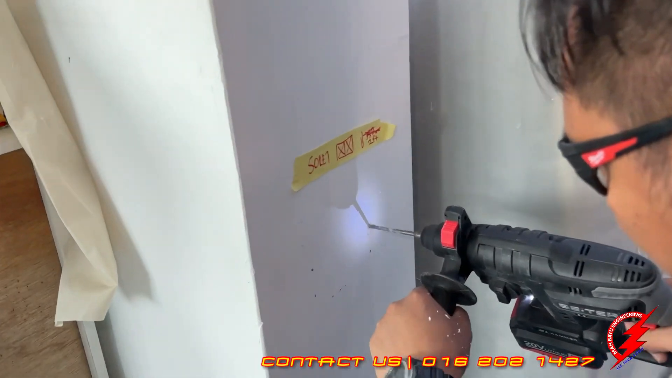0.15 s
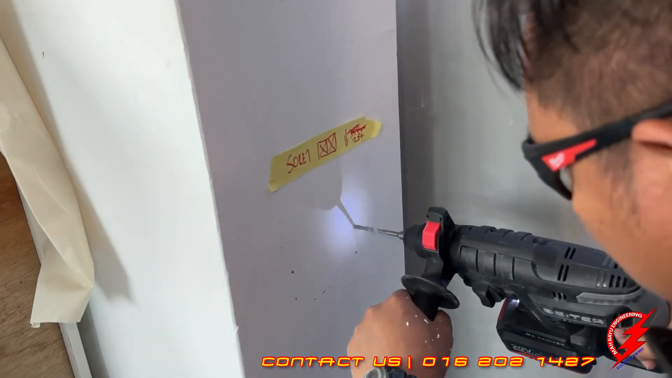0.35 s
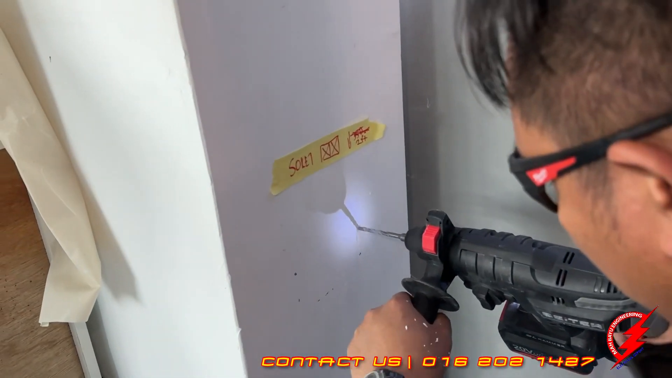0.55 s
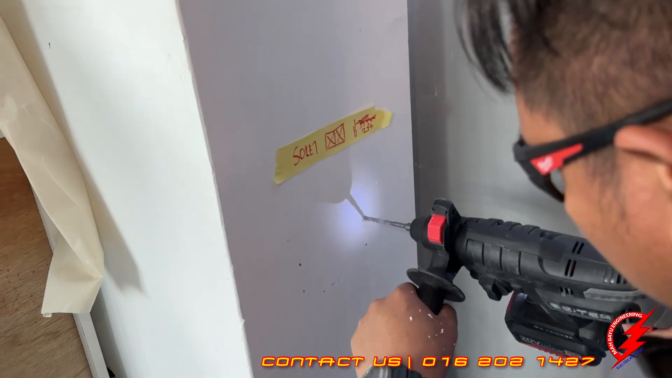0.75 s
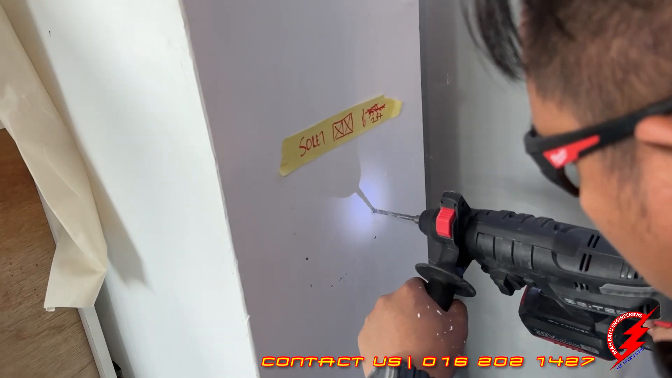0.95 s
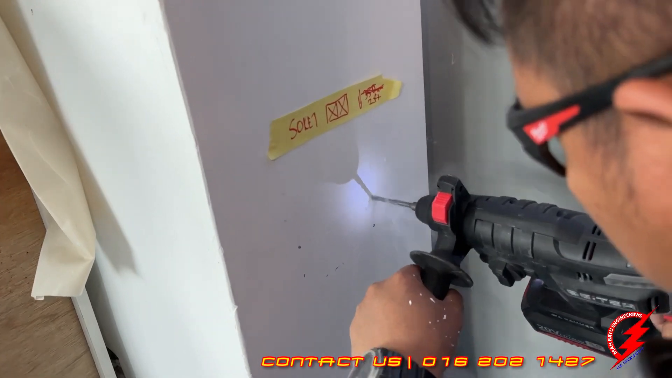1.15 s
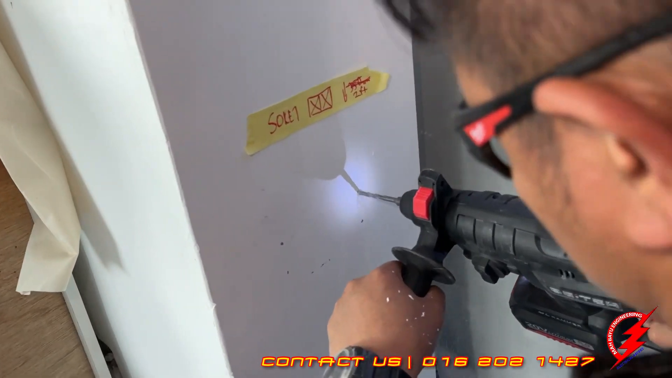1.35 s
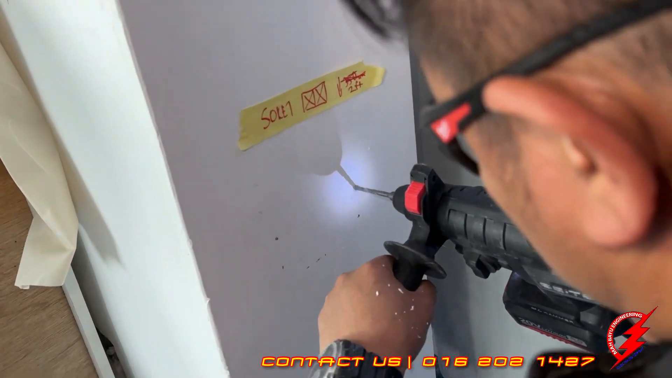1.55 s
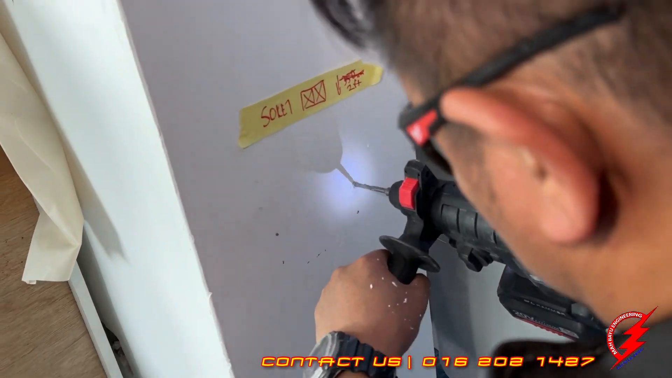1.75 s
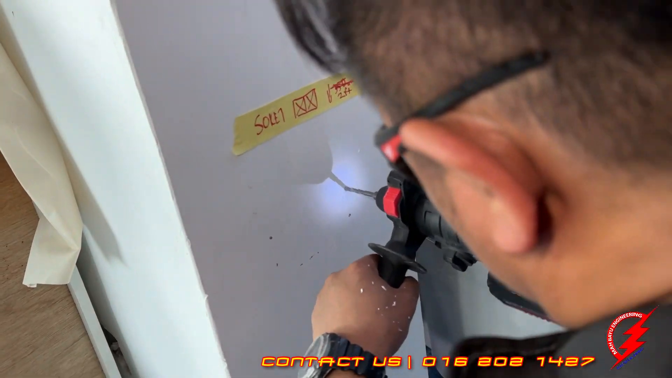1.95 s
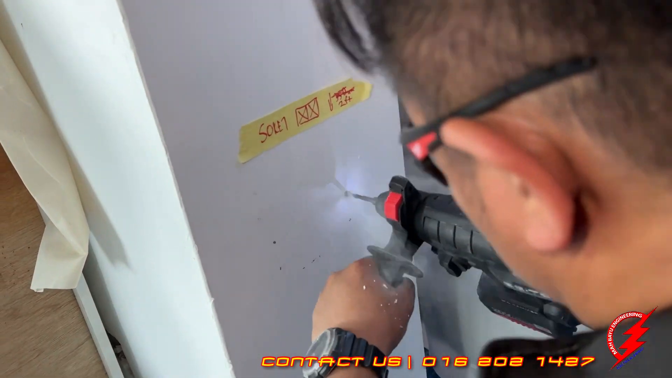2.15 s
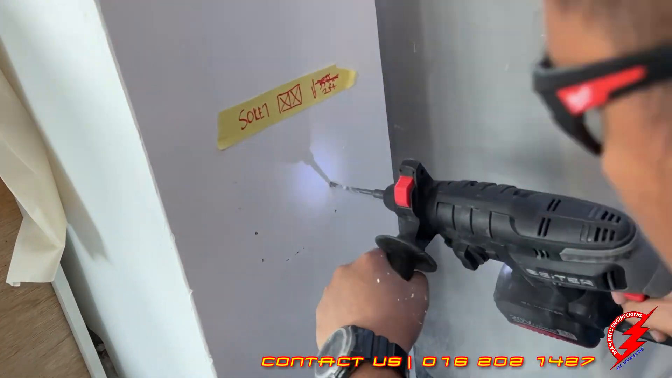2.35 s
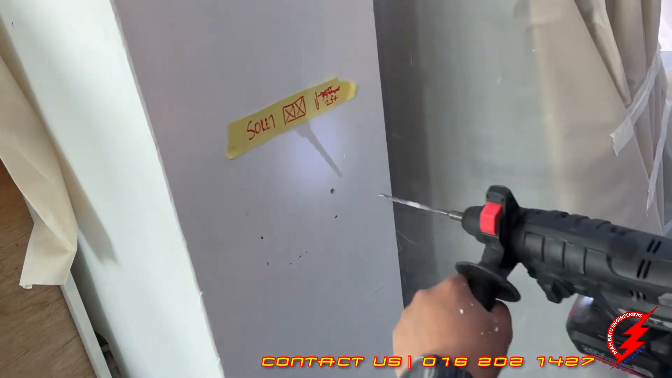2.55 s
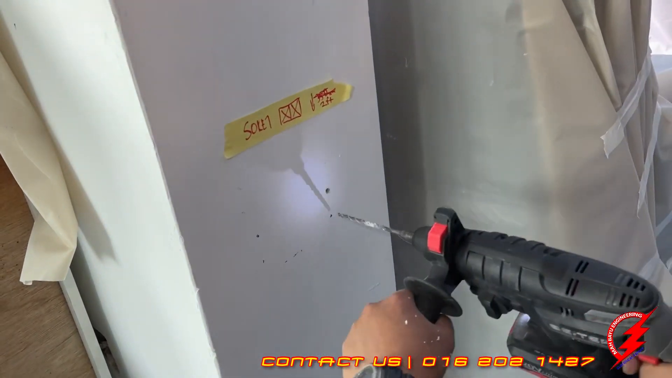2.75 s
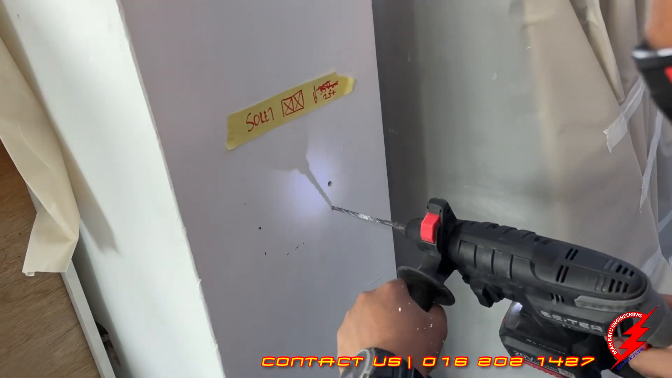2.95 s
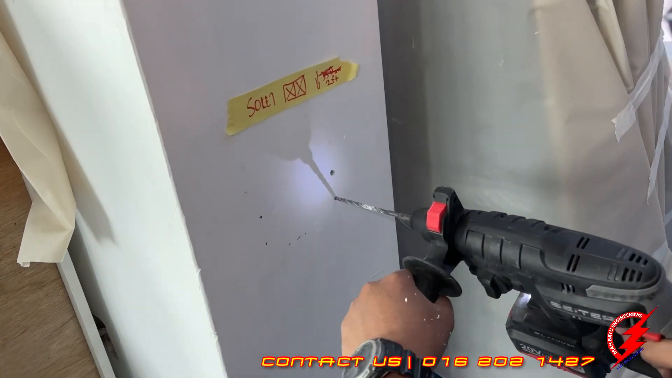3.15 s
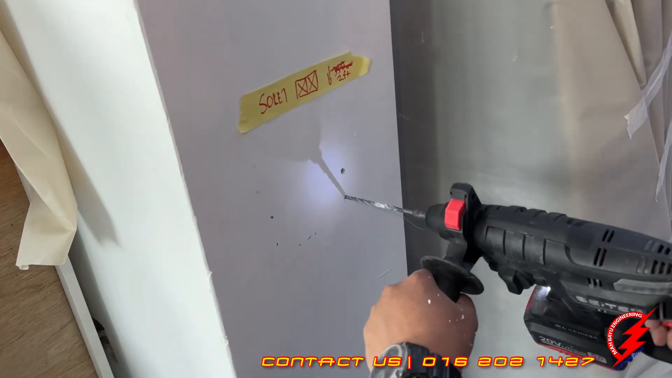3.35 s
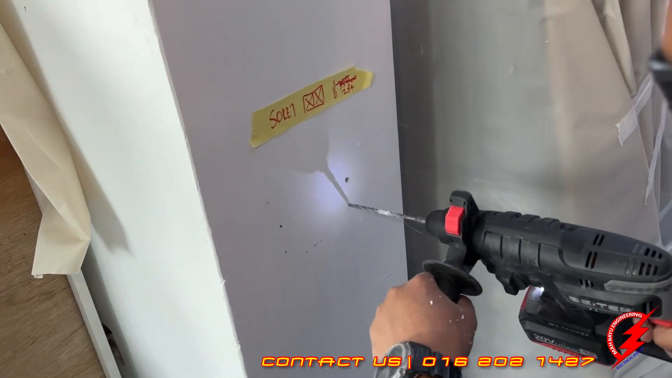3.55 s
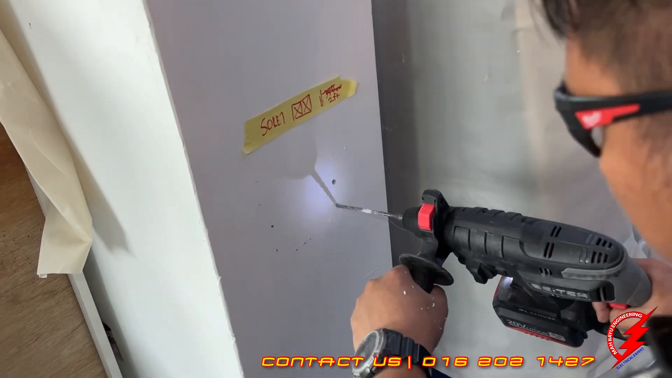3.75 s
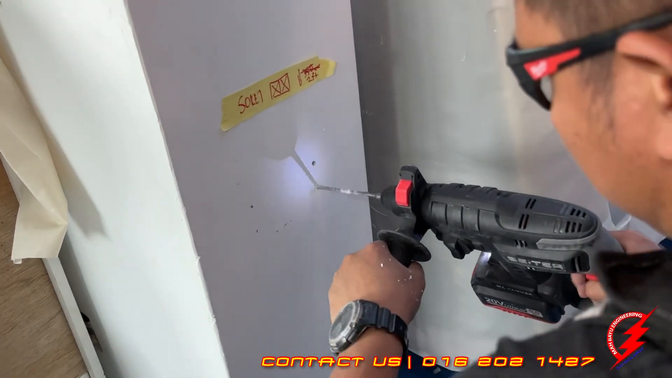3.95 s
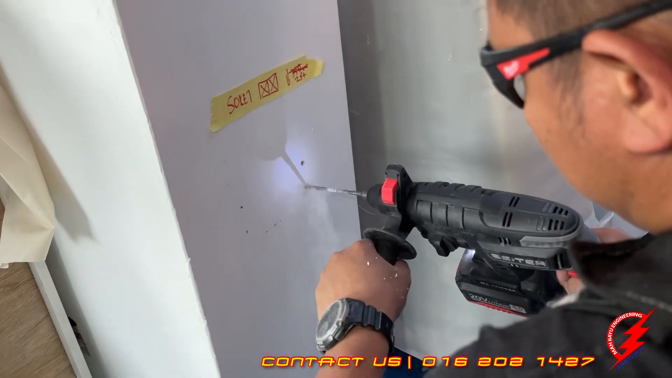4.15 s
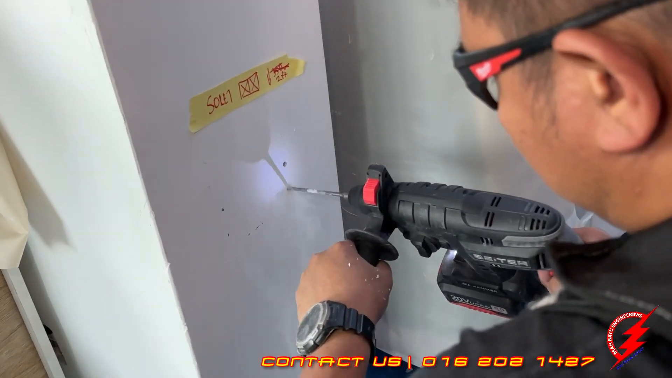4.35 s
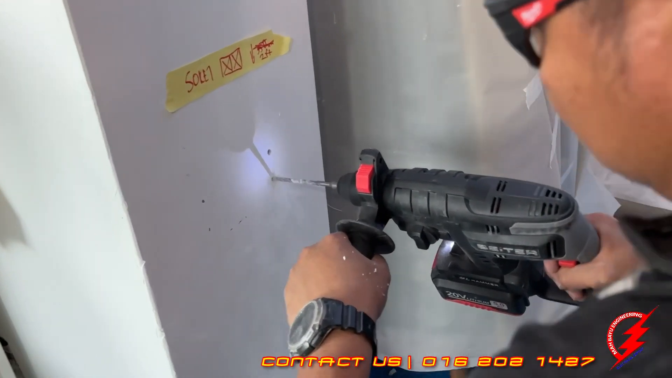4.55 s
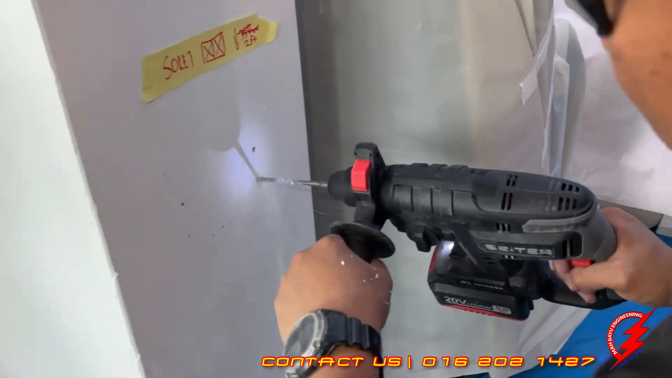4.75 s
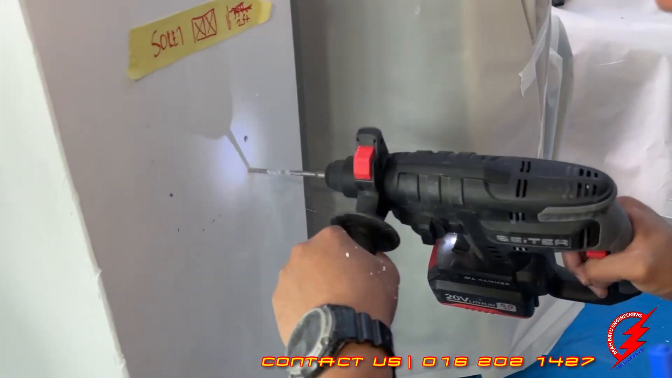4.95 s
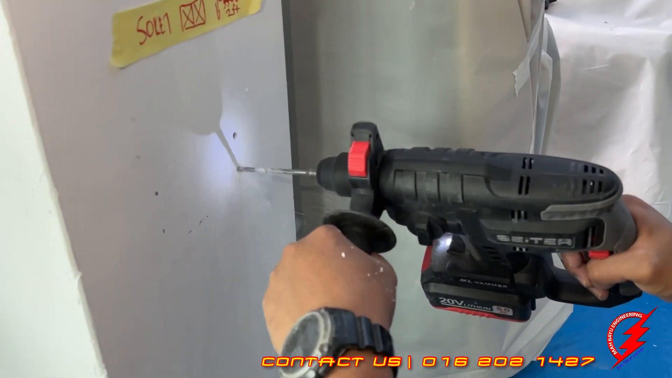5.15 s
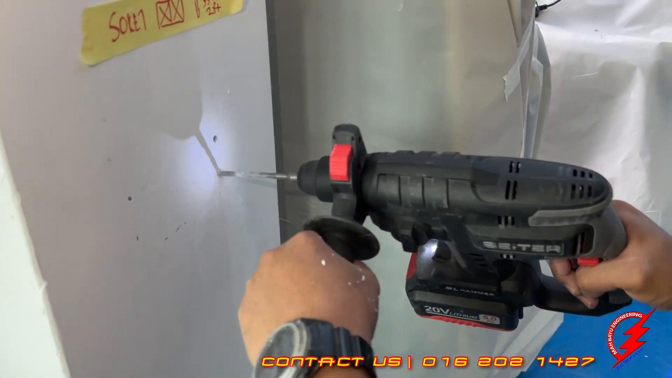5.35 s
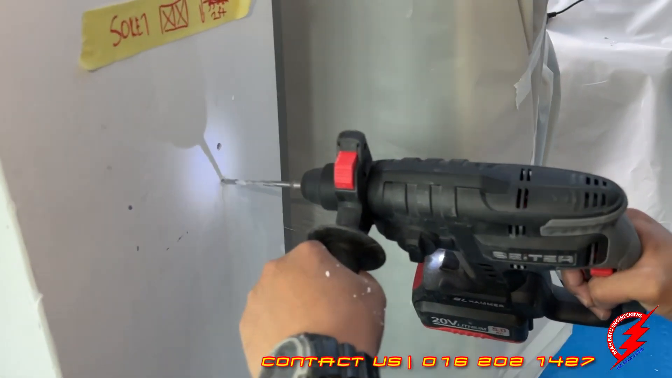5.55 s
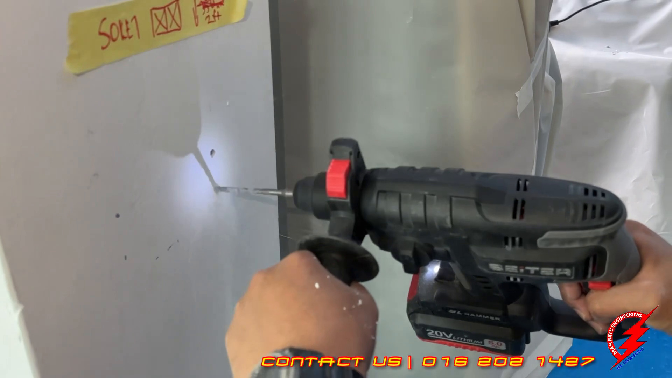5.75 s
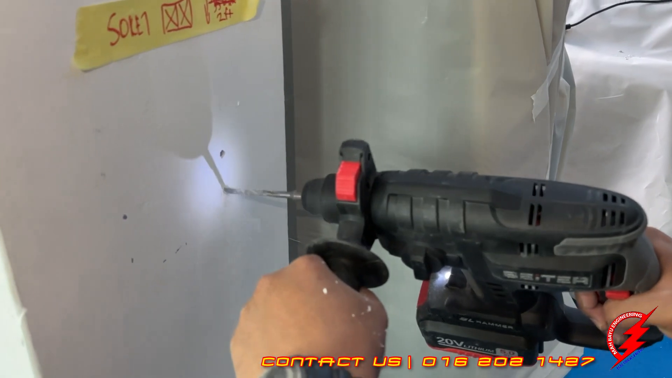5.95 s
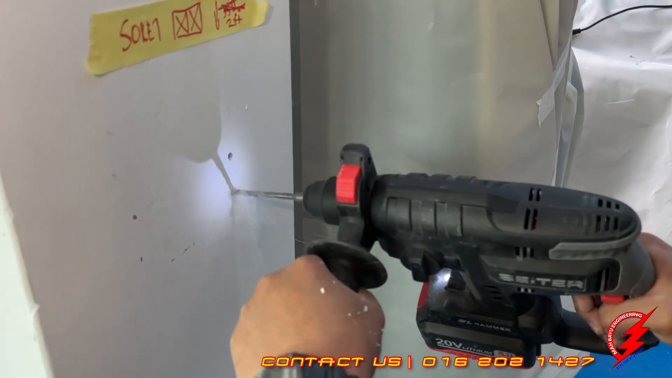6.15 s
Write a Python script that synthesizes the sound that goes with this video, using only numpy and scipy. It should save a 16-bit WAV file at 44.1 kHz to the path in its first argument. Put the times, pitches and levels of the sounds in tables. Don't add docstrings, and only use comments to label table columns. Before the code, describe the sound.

A hammer drill is already boring at the start, dense fast blows, metallic chatter and fan hiss blending with a high gear whine. It catches briefly, later labours deeply, spins free and quits. After under a second of near silence with tiny grit ticks, the trigger clicks, the motor rises quickly, the bit skips, then bites into a new hole and drills steadily, heard close in a small reflective room.

```python
import sys
import numpy as np
from scipy import signal
from scipy.fft import rfft, irfft, next_fast_len
from scipy.io import wavfile
from scipy.ndimage import uniform_filter1d, minimum_filter1d

SR = 44100
rng = np.random.default_rng(int(sys.argv[2]) if len(sys.argv) > 2 else 0)


def convert_level_to_amplitude(level_db):
    exponent = np.asarray(level_db, float) / 20
    return 10 ** exponent


def pcm_store(signal):
    levels = np.round(np.clip(np.atleast_2d(signal), -1, 1) * 32767)
    wavfile.write(sys.argv[1], SR, levels.astype(np.int16).T)


N = 272735
T = np.arange(N) / SR

# time_s, loudness_db, wall_contact_db, gear_whine_db, bit_drag (0-1)
WORK = [(0, 1, -0.5, -5, 0), (.2, 0, -0.5, 1, 0), (.95, -.5, 1, 1, 0), (1.45, -1.5, -0.5, 2, 0),
        (1.75, -2, 1, -2.5, .9), (2.0, -3, 3, 2, .9), (2.12, -0.5, 0.5, -9, 0.31),
        (2.25, -0.5, -0.5, -2, .3), (2.3, 0, -6, -5.5, 0), (2.65, 0.5, -8.5, -2.5, -.5),
        (3.47, -1.5, -13.5, -6.5, 0), (3.73, -3.5, -12, 1, 0), (3.79, -5.5, 6.5, -1.5, 0.2),
        (4.02, -3, 4.5, -3, .5), (4.039, 3.5, 2, -1.5, 0), (4.35, 3, 0, -1, .2), (5.0, 1, 2, 0, 0.01),
        (6.19, 0, 5, 0.5, 0.02)]
# start_s, end_s
HAMMERING = [
    (0, 2.27),
    (4.03, 6.19),
]
# time_s, mesh_hz
SPIN_UP = [(3.472, 604.1), (3.5, 845), (3.6, 1332), (3.75, 1326), (3.86, 1277), (4.001, 1258),
           (4.026, 1261)]
# lowest_s, bogging_s, sag_hz, overshoot_hz, held_s
JAMS = [
    (1.125, .165, 94.95, 113, .045),
    (2.07, .09, 250, 105, .17),
    (2.25, 0.0601, 35, 1, .001),
    (4.015, 0.012, 25.6, 190, .035),
]
# start_s, length_s, second_mesh_db, pinion_db
SLIPS = [(0.341, 0.036, -10.5, -2), (0.514, 0.04, -11, 2), (1.127, 0.053, 5.5, -3), (1.22, 0.066, -1, -7),
         (1.69, .07, -12, 0), (1.809, 0.045, -11.5, 0), (2.013, 0.13, -14, -12), (2.127, 0.037, -6, 11.5),
         (2.2, 0.081, -7, -4), (2.27, 0.068, -2, 7.5), (2.541, 0.057, -1.5, 3), (4.166, 0.05, 5, 2),
         (4.222, 0.14, -11, 0), (4.3, .12, -0.5, -3), (4.56, .2, 0.5, -4)]
# blow_rate_multiple, level_db
FIRST_PARTIALS = [(1, -22), (2, -13.5), (3, -3), (4, -7), (5, 0), (6, 3), (7, -7), (8, -7.5), (9, -23),
                  (10, -21), (11, -2), (12, -3), (13, -9), (14, -3.5), (15, -12.5), (16, -2), (17, -12),
                  (18, -6), (19, -3.5), (20, -28.5), (21, -21), (22, -23)]
# blow_rate_multiple, level_db
SECOND_PARTIALS = [(1, -23.5), (2, -8.5), (3, -3), (4, -2), (5, 0.5), (6, 1.5), (7, -2), (8, -7.5),
                   (9, -14), (10, -21), (11, -6), (12, -7.5), (13, -3), (14, -1.5), (15, -10.5), (16, -11),
                   (17, -14.5), (18, -1.5), (19, -2), (20, -6), (21, -11.5), (22, -9)]
# frequency_hz, gain_db
PANEL = [(60, 0), (138, 0), (155, 8), (185, 3), (212, 0), (282, 0), (303, 7), (335, 0), (2000, 0)]
# frequency_hz, density_db (per Hz)
WALL_RUMBLE = [(20, -34.5), (40, -22.5), (70, -16), (100, -15.5), (160, -3), (230, -10), (300, 1.5),
               (450, -3), (650, -16), (900, -20.5)]
# frequency_hz, gain_db
WALL = [(35, -51), (60, -18), (137, -11), (203, -1.5), (408, 3), (630, -9), (1220, -5), (1700, -5),
        (2210, 2), (3740, -120)]
# time_s, peak_db
SKIPS = [(3.7751, -12.5), (3.7938, -12), (3.8224, -15), (3.8352, -11.5), (3.8656, -12), (3.9015, -13),
         (3.9512, -11), (3.9903, -10), (4.0125, -7.5)]
# frequency_hz, density_db (per Hz)
RATTLE = [(290, -35), (500, -2.5), (638, -0.5), (1290, -7), (1560, -10.5), (2230, -10.5), (2570, -7),
          (2920, -10), (4000, -10.5), (5200, -48), (8800, -120)]
# frequency_hz, density_db (per Hz)
FAN = [(2500, 3.5), (3200, 6.5), (4500, 1.5), (5700, -5.5), (6500, -3.5), (6750, 3.5), (7000, -4),
       (8100, -7), (8450, 2), (8900, -3), (12300, 3), (13000, -5), (14800, -13.5), (16000, -6.5)]
# frequency_hz, level_db
BIT = [(2000, -31.5), (6000, -17.5), (8000, -11.5), (10000, -33), (12000, -10), (13000, -6), (14800, 0.5),
       (15800, -11)]
# mesh_multiple, level_db (against the second mesh multiple)
LOADED_TONES = [(2.603, -13), (5.2, -10), (6.5, -27.5), (11.52, -18)]
# mesh_multiple, level_db
FREE_TONES = [(1.5, -11), (2.5, -0.5), (2.54, -8), (5.07, -5), (6.37, -6)]
# start_s, pitch_hz, level_db, t60_s
KNOCK = [
    (3.142, 430, -50, 0.093),
    (3.16, 1450, -59, .05),
    (3.16, 2530, -58.5, .04),
    (5.09, 45, -35, .12),
]
# start_s, pitch_hz, level_db, t60_s
TRIGGER = [
    (3.470, 2570, -28, 0.045),
    (3.475, 2520, -31.5, 0.24),
    (3.470, 5200, -41, .03),
    (3.470, 7200, -39, .03),
    (4.5, 6700, -21.5, 0.034),
]
# peak_s, low_db, high_db, attack_s, fade_db_per_s
SLEEVE = [(2.76, -53.5, -56, .006, 250), (2.87, -52, -52.5, 0.079, 135.5), (2.976, -70, -72, 0.018, 130),
          (3.155, -57.5, -62, .016, 149), (3.25, -72, -74, .03, 29), (3.46, -74, -61, 0.017, 900)]
# time_s, peak_db
CRUMBS = [(2.8193, -44), (2.852, -50), (2.9295, -45), (2.9679, -52), (3.0014, -57), (3.0297, -47),
          (3.1425, -62), (3.2414, -60)]
# frequency_hz, level_db (against the direct sound)
ROOM = [(30, -9.5), (120, -19.5), (250, -16.5), (500, -14), (1000, -7.5), (1700, -2), (3000, -3),
        (4300, -4), (6000, -1), (7600, 0), (8300, -17.5), (9300, -18), (10000, -10), (12600, -31),
        (13400, -27), (15000, -10)]
# frequency_hz, left_minus_right_db
LEAN = [(100, .5), (380, 2), (700, 0), (1300, -2.5), (2400, -1), (4400, 1), (7000, .4), (8000, 0),
        (15000, 0)]
# frequency_hz, left_lead_rad
PORTS = [(0, 0), (1300, 0), (2500, .4), (4500, .1), (6700, .6), (7700, .3), (8200, 0), (9300, -.1),
         (10200, -2.75), (10800, -np.pi), (11900, -np.pi), (12400, -3.6), (13200, -2 * np.pi),
         (14900, -2 * np.pi), (16400, -6.9)]
# frequency_hz, density_db (per Hz)
FLOOR = [(15, -60), (25, -19), (76, -8), (115, -20), (269, -20), (700, -32), (1560, -36.5), (8150, -51),
         (12000, -61), (15600, -87.5), (22000, -120)]

STOP_S, PULL_S, BITE_S = 2.648, SPIN_UP[0][0], SPIN_UP[-1][0]
CRUISE_HZ, DRAG_HZ = 1288, 16
MESHES_PER_BLOW = 18.43
RECOVER_HZ_PER_S, SETTLE_S, BRAKE_S = 4500, .08, .025
LOADED_PINION, FREE_PINION = 3.247, 3.8
MESH_DB, SECOND_DB, PINION_DB = -35.5, -26, -25
WALL_DB, CHUCK_DB, FAN_DB, BIT_DB = -27, -23.5, -26.5, -26.5
WAKE_DB, WAKE_S = -15.5, .034
DEEP_FROM_S, DEEP_IN_S = 4.69, .69
DEEP_MESH_DB, DEEP_PINION_DB, DEEP_WALL_DB = 9, 5.5, -4
BOG_MESH_DB = 10
FIRST_TICK_DB = -1.8
HALF_TONE_S, HALF_TONE_DB = 3.525, -38
ROOM_T60_S, LATE_T60_S, LATE_DB = .13, .45, -29
FLOOR_DB = -65


def level(x):
    return x / np.sqrt(np.mean(x ** 2))


def colour(x, table, share=0.87):
    hz, db = np.transpose(table)
    grid = np.log(np.arange(2049) * SR / 4096 + 1)
    log_gain = np.interp(grid, np.log(hz), share * db) * np.log(10) / 20
    cepstrum = irfft(log_gain)
    cepstrum[1:2048] *= 2
    cepstrum[2049:] = 0
    impulse = irfft(np.exp(rfft(cepstrum)))
    return signal.fftconvolve(x, impulse)[:len(x)]


def band(x, lo_hz, hi_hz):
    return signal.sosfilt(signal.butter(3, [lo_hz, hi_hz], "band", fs=SR, output="sos"), x)


def walk(rate_hz):
    k = int(SR / rate_hz)
    held = np.repeat(rng.standard_normal(N // 40)[:N // k + 1], k)[:N]
    return 1.3 * uniform_filter1d(uniform_filter1d(held, k), k)


def burst(pulses, tau_s):
    t = T[:2000] / tau_s
    return signal.fftconvolve(pulses, t * np.exp(1 - t))[:N]


def hammer(strokes, pressed, even, wall_db, chuck_db, fan_db, bit_db):
    steady, lone = blows(strokes, pressed)
    noise = rng.standard_normal(N) * (1 + 0.58 * burst(steady, 0.0026))
    steel = level(colour(rng.standard_normal(N), BIT))
    out = wall(strokes, pressed, even, noise, wall_db) + chuck(noise, chuck_db)
    out += fan(noise, fan_db) + bit(steel, steady, pressed, bit_db)
    return out + skips(steel, noise, lone)


def blows(strokes, pressed, scatter_db=2.0, jitter_s=.0005):
    at = np.flatnonzero(np.diff(np.floor(strokes)))
    chance = rng.standard_normal((N // 400, 2))[:len(at)]
    at = np.clip(at + (chance[:, 0] * jitter_s * SR).astype(int), 0, N - 1)
    steady, lone = np.zeros(N), np.zeros(N)
    steady[at] = pressed[at] * convert_level_to_amplitude(scatter_db * chance[:, 1])
    for time_s, db in SKIPS:
        lone[int(time_s * SR)] = convert_level_to_amplitude(db)
    return steady, lone


def wall(strokes, pressed, even, noise, wall_db):
    ringing = convert_level_to_amplitude(-1.0) * pressed * even * thump(strokes)
    rumble = level(colour(noise, WALL_RUMBLE)) * convert_level_to_amplitude(1.9 * walk(20))
    rumble_db = -10.0 + 6.1 * (1.5 - pressed * even)
    return convert_level_to_amplitude(wall_db) * (ringing + convert_level_to_amplitude(rumble_db) * rumble)


def thump(strokes, spread=.33):
    first = T < PULL_S
    rate_hz = np.gradient(strokes) * SR
    stack = np.zeros(N)
    for (k, first_db), (_, second_db) in zip(FIRST_PARTIALS, SECOND_PARTIALS):
        panel_db = np.interp(k * rate_hz, *np.transpose(PANEL))
        db = np.where(first, first_db, second_db) + panel_db + 1.4 * walk(14)
        phase = 2 * np.pi * k * strokes - spread * k ** 2 + 0.055 * k * walk(25)
        stack += convert_level_to_amplitude(db) * np.cos(phase)
    return stack / band(stack, 110, 636).std()


def chuck(noise, chuck_db):
    rattle = level(band(colour(noise, RATTLE), 740, 3010))
    return convert_level_to_amplitude(chuck_db - 3.5) * rattle * convert_level_to_amplitude(0.72 * walk(25.22))


def fan(noise, fan_db):
    air = band(colour(noise, FAN), 2960, 17000)
    return convert_level_to_amplitude(fan_db - 1.5) * air / band(air, 4800, 9950).std()


def bit(steel, steady, pressed, bit_db):
    first_db = FIRST_TICK_DB * (T < STOP_S)
    ticks = convert_level_to_amplitude(9.5 + first_db) * burst(steady, 0.0007)
    grind = convert_level_to_amplitude(-10.0 - first_db) * pressed
    calm_db = uniform_filter1d(minimum_filter1d(bit_db, size=6000), size=2000)
    return steel * (convert_level_to_amplitude(bit_db) * (ticks + grind) + convert_level_to_amplitude(calm_db - 15.5) * (1 - pressed))


def skips(steel, noise, lone):
    envelope = burst(lone, 0.00071)
    tick = convert_level_to_amplitude(4.0) * band(steel, 8500, 17000) * envelope
    knock = convert_level_to_amplitude(22.5) * colour(lone, WALL)
    return tick + knock + convert_level_to_amplitude(-6.0) * level(band(noise, 900, 9000)) * envelope


def gears(turns, mesh_db, second_db, pinion_db, free, pressed):
    shake = pressed * np.sin(2 * np.pi * turns / MESHES_PER_BLOW)

    def tone(k):
        wander = 0.17 * shake + (0.18 + 0.14 * free) * walk(150)
        return np.sqrt(2) * convert_level_to_amplitude(1.54 * walk(60)) * np.sin(2 * np.pi * k * turns + k * wander)

    out = convert_level_to_amplitude(mesh_db) * tone(1) + convert_level_to_amplitude(second_db) * tone(2)
    out += convert_level_to_amplitude(pinion_db) * ((1 - free) * tone(LOADED_PINION) + free * tone(FREE_PINION))
    loaded = sum(convert_level_to_amplitude(db) * tone(k) for k, db in LOADED_TONES)
    out += (1 - free) * convert_level_to_amplitude(uniform_filter1d(second_db, size=9000)) * loaded
    out += free * (T > HALF_TONE_S) * convert_level_to_amplitude(HALF_TONE_DB) * tone(.5)
    spinning = sum(convert_level_to_amplitude(db) * tone(k) for k, db in FREE_TONES)
    return out + free * convert_level_to_amplitude((second_db + pinion_db) / 2) * spinning


def speed(drag):
    hz = CRUISE_HZ - DRAG_HZ * drag
    for low_s, bog_s, sag, over, hold_s in JAMS:
        top_s = low_s + (sag + over) / RECOVER_HZ_PER_S
        end_s = top_s + hold_s
        times = [low_s - bog_s, low_s, top_s, end_s, end_s + SETTLE_S]
        hz = hz + np.interp(T, times, [0, -sag, over, over, 0])
    free = (T > STOP_S + .5) & (T < BITE_S)
    return np.where(free, np.interp(T, *np.transpose(SPIN_UP)), uniform_filter1d(hz, size=600))


def controls():
    time_s, *columns = np.transpose(WORK)
    loud_db, contact_db, whine_db, drag = (np.interp(T, time_s, c) for c in columns)
    on = (T < STOP_S) | (T > PULL_S)
    free = (T > PULL_S) & (T < BITE_S)
    hz = speed(drag)
    off_speed = (1 - free) * (hz / CRUISE_HZ - 1) * 10
    fast, slow = np.clip(off_speed, 0, 2), np.clip(-off_speed, 0, 1)
    loud_db = loud_db + WAKE_DB * (T > STOP_S + .5) * np.exp(-np.clip(T - PULL_S, 0, 9) / WAKE_S)
    deep = np.clip((T - DEEP_FROM_S) / DEEP_IN_S, 0, 1)
    slips_db = np.zeros((2, N))
    for start_s, length_s, *db in SLIPS:
        slips_db += np.outer(db, (T > start_s) & (T < start_s + length_s))
    second_slip_db, pinion_slip_db = uniform_filter1d(slips_db, size=300)
    tones_db = loud_db + whine_db - 3. * free * np.clip(1 - hz / CRUISE_HZ, 0, .3) / .3

    mesh_db = MESH_DB + loud_db + .4 * whine_db + DEEP_MESH_DB * deep ** 2
    mesh_db += BOG_MESH_DB * slow ** .5 - 5.6 * fast + 0.69 * free + .7 * walk(14)
    second_db = SECOND_DB + tones_db + second_slip_db - 5.6 * slow - 10.0 * fast + .7 * walk(14)
    pinion_db = PINION_DB + tones_db + DEEP_PINION_DB * deep - 9.07 * drag
    pinion_db += -15.0 * slow + 2.9 * fast + pinion_slip_db + .7 * walk(14)
    wall_db = WALL_DB + loud_db + contact_db + DEEP_WALL_DB * deep + 2.06 * fast - 2.3 * slow
    chuck_db = CHUCK_DB + loud_db + 0.18 * contact_db + 1.4 * fast + 0.91 * walk(12)
    fan_db = FAN_DB + loud_db - 0.11 * contact_db - 1.2 * fast
    bit_db = BIT_DB + loud_db + .9 * contact_db + .6 * fast - 1.5 * slow + 1.1 * walk(9.1)

    gear_levels = mesh_db, second_db, pinion_db
    hammer_levels = wall_db, chuck_db, fan_db, bit_db
    on, free = (uniform_filter1d(1. * flag, size=200) for flag in (on, free))
    return hz, gear_levels, hammer_levels, on, free


def drill():
    mesh_hz, (mesh_db, second_db, pinion_db), hammer_levels, on, free = controls()
    resting = T < 3.2
    coast = np.where(resting, np.exp(-np.clip(T - STOP_S, 0, 1) / BRAKE_S), on)
    braking = 1 - .035 * resting * np.exp(np.clip(T - STOP_S, -1, 0) / 0.0078)
    turns = np.cumsum(mesh_hz * (1 + .0028 * walk(9)) * braking) / SR
    pressed = sum(1. * (T >= start_s) * (T < end_s) for start_s, end_s in HAMMERING)
    pressed = uniform_filter1d(pressed, size=400)
    even = np.clip(1 - 2.5 * np.abs(mesh_hz / CRUISE_HZ - 1), .65, 1)
    whine = gears(turns, mesh_db - 2.0, second_db, pinion_db - 2.0, free, pressed)
    beat = hammer(turns / MESHES_PER_BLOW + 0.3, pressed, even, *hammer_levels)
    return on * whine + coast * beat, on


def rings(table):
    out = np.zeros(N)
    for start_s, hz, db, t60_s in table:
        t = T - start_s
        out += convert_level_to_amplitude(db) * (t > 0) * np.sin(2 * np.pi * hz * t) * 1000. ** (-np.clip(t, 0, 2) / t60_s)
    return out


def rustle():
    grains = rng.standard_normal(N) * convert_level_to_amplitude(3.0 * walk(220))
    grit = np.zeros(N)
    for time_s, db in CRUMBS:
        grit[int(time_s * SR)] = convert_level_to_amplitude(db - 13.0)
    low_env, high_env = np.zeros(N), burst(grit, 0.0017)
    for peak_s, low_db, high_db, attack_s, fade in SLEEVE:
        t = T - peak_s
        stir = np.clip(1 + t / attack_s, 0, 1) ** 2 * convert_level_to_amplitude(-fade * np.clip(t, 0, 1)) * (T < 3.6)
        low_env += convert_level_to_amplitude(low_db) * stir
        high_env += convert_level_to_amplitude(high_db) * stir
    low = level(band(grains, 200, 1610))
    high = level(band(grains, 1800, 7900)) + convert_level_to_amplitude(-15.0) * level(band(grains, 12500, 15500))
    return low * low_env + high * high_env


def cloud(t60_s):
    t = T[:SR // 2]
    decay = (t > .001) * 1000. ** (-t / t60_s)
    return level(rng.standard_normal(len(t)) * decay) / np.sqrt(len(t))


def room(x):
    echo = signal.fftconvolve(x, colour(cloud(ROOM_T60_S), ROOM))[:N]
    size = next_fast_len(N + SR)
    lead = np.interp(np.arange(size // 2 + 1) * SR / size, *np.transpose(PORTS))
    ears = []
    for side in (1, -1):
        spectrum = rfft(colour(x, LEAN, share=side / 2), size)
        direct = irfft(spectrum * np.exp(.5j * side * lead), size)[:N]
        tail = signal.fftconvolve(x, band(cloud(LATE_T60_S), 100, 8500))[:N]
        ears.append(direct + side * echo + convert_level_to_amplitude(LATE_DB) * tail)
    return np.array(ears)


def leak(near):
    filling = walk(45) > np.where(T > 3.76, .3, 1.4)
    return convert_level_to_amplitude(-12.) * band(near, 9500, 12300) * uniform_filter1d(1. * filling, size=100)


def draught(on):
    ports = []
    for _ in range(2):
        air = level(band(rng.standard_normal(N), 18, 70))
        ports.append(air * convert_level_to_amplitude(-75.5 + 4. * walk(4.4)) * on)
    return np.array(ports)


def room_tone():
    hum = [level(colour(rng.standard_normal(N), FLOOR)) for _ in range(3)]
    return convert_level_to_amplitude(FLOOR_DB) * (hum[0] + 0.45 * np.array(hum[1:]))


def scene():
    tool, on = drill()
    near = convert_level_to_amplitude(-3.5) * tool + rustle() + rings(KNOCK) + rings(TRIGGER)
    return room(near) + leak(near) + draught(on) + room_tone()


def low_pass(x):
    return signal.sosfilt(signal.butter(12, 16820, fs=SR, output="sos"), x)


def record(dry):
    cut = signal.sosfilt(signal.ellip(10, .2, 70, 15860, fs=SR, output="sos"), dry)
    mix = np.clip(cut, -1, 1)
    return low_pass(mix)


dry = scene()
out = record(dry)
pcm_store(out)
```